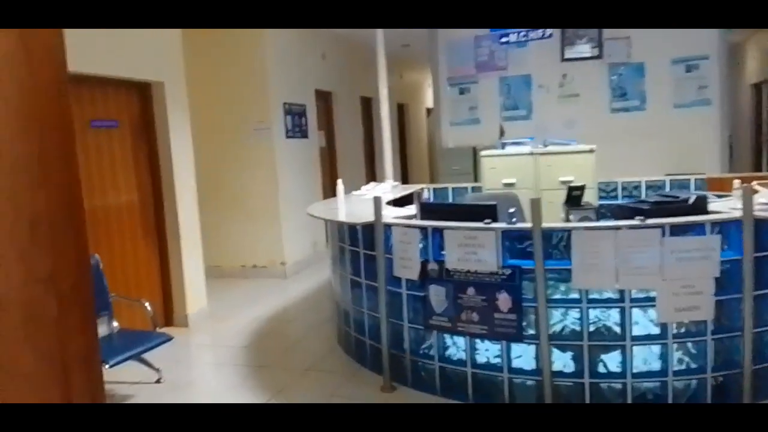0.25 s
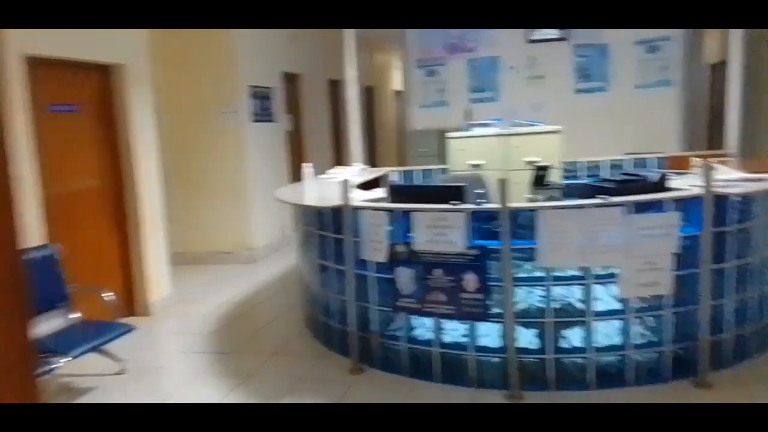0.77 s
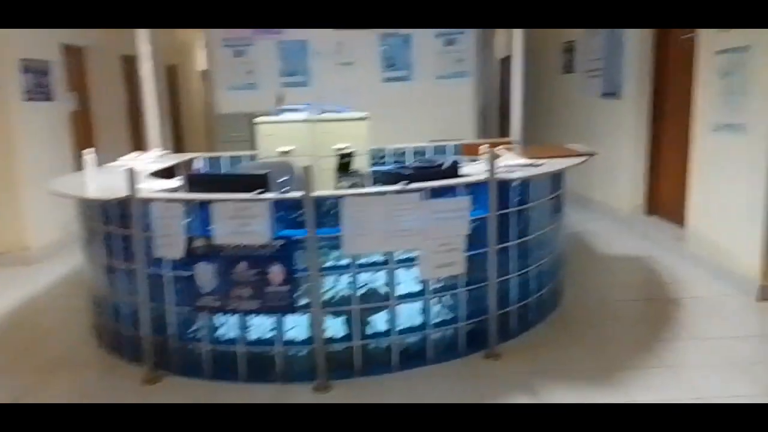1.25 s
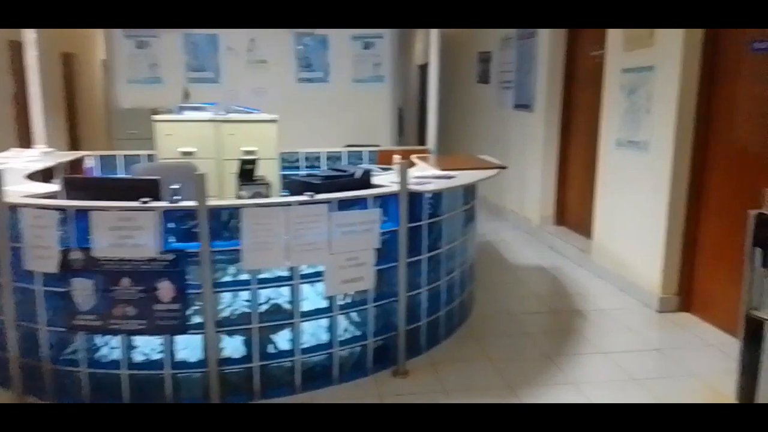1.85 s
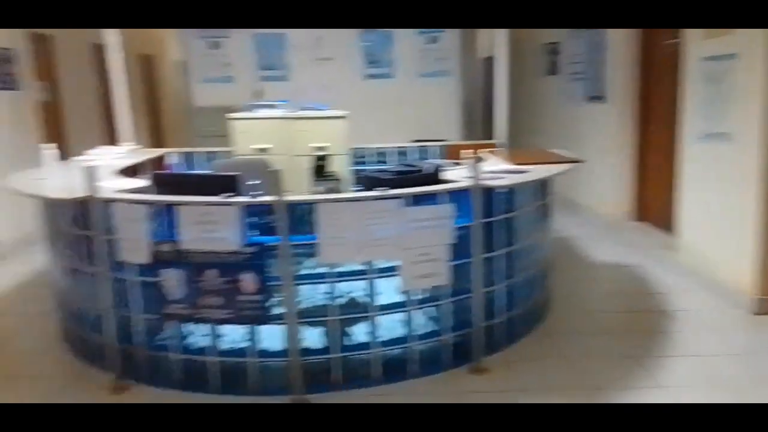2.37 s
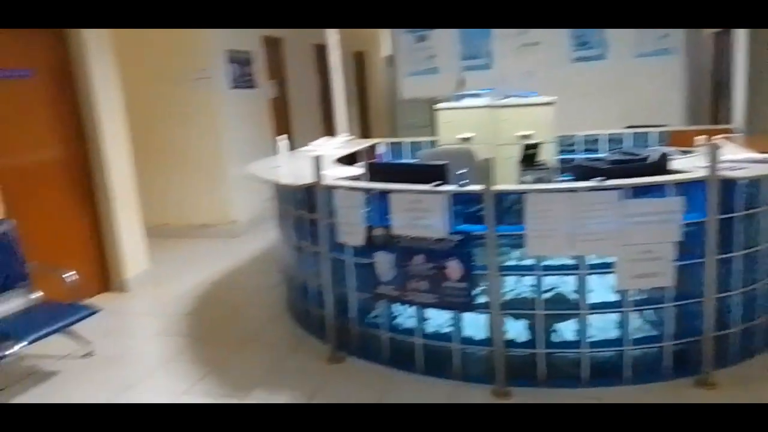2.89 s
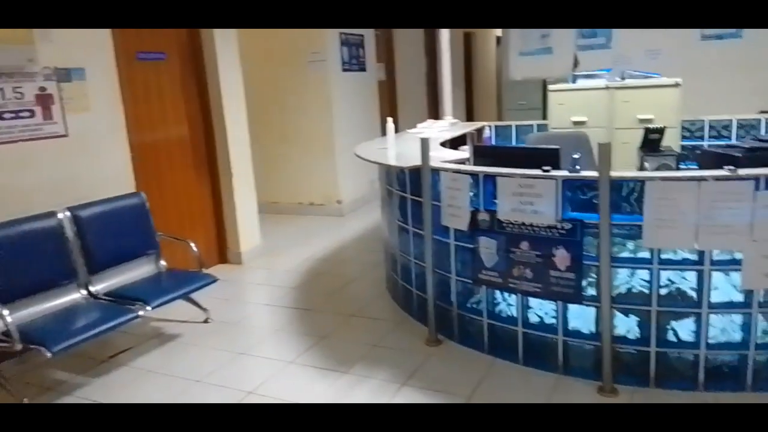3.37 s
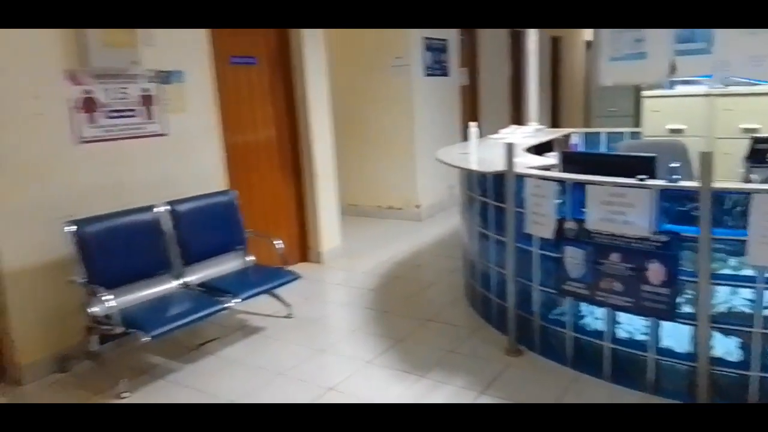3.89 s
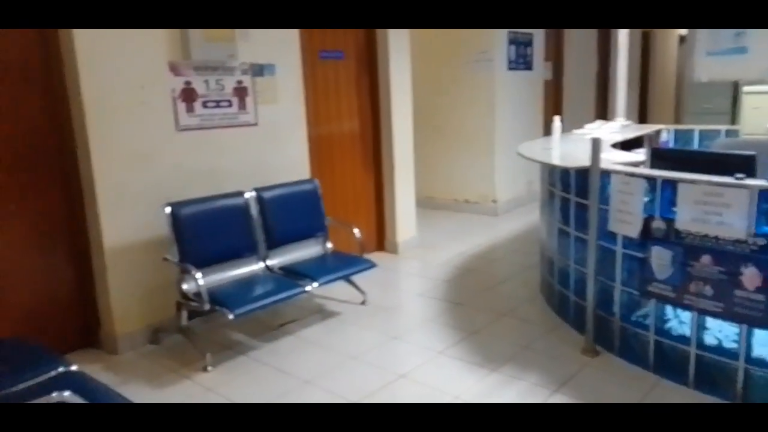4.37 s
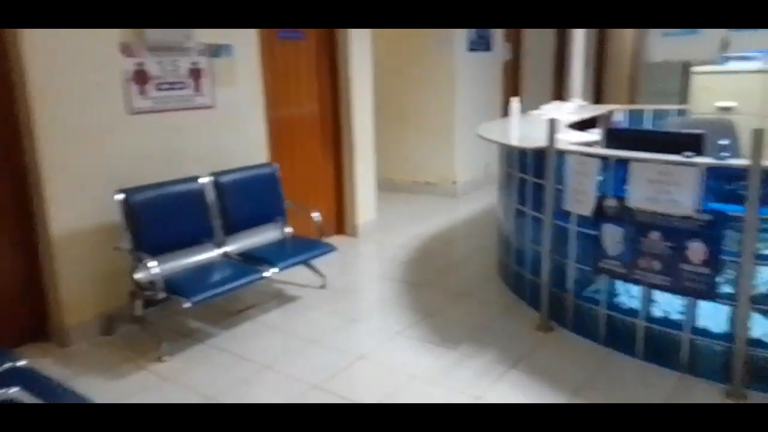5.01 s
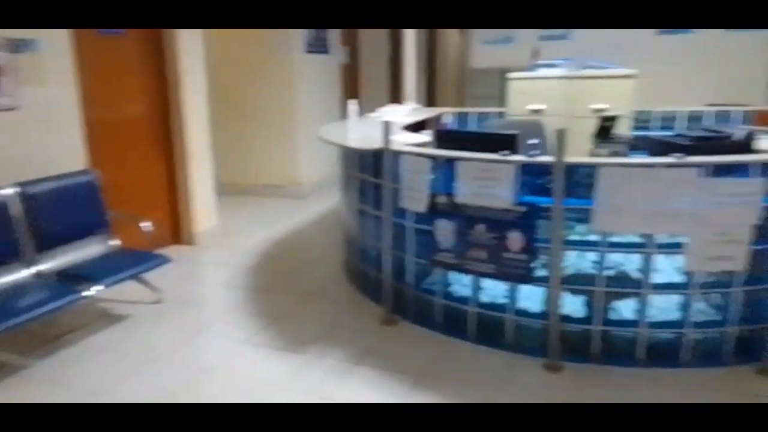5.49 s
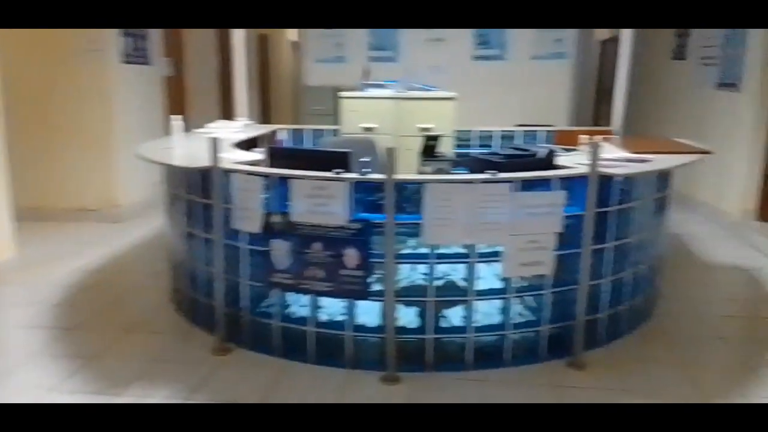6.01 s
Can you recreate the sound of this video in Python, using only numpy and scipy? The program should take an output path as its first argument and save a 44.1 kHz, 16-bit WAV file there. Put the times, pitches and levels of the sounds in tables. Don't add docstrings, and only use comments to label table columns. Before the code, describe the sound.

In a tiled, echoing hall, shrill crickets trill without stopping, their pitch sinking slightly in each short phrase. Rough little bird whistles come in scattered clusters. Early on, soles drag and slap and a faint distant motorbike speeds up then vanishes; late, another crisp slap. Low thuds of a hand on the recorder, patchy hiss and soft traffic rumble sit underneath.

```python
import sys
import numpy as np
from scipy import signal
from scipy.fft import rfft, irfft
from scipy.io import wavfile
from scipy.ndimage import uniform_filter1d, map_coordinates

SR = 44100
rng = np.random.default_rng(int(sys.argv[2]) if len(sys.argv) > 2 else 0)


def undo_db(level):
    steps = np.asarray(level, float) / 20
    return 10 ** steps


def to_wav(s):
    ch = np.atleast_2d(s).T
    pcm = np.round(np.clip(ch, -1, 1) * 32767)
    wavfile.write(sys.argv[1], SR, pcm.astype(np.int16))


N = 275625

# (frequency [Hz], level per Hz [dB])
WING_SPECTRUM = [(2500, -40), (4250, -40), (4560, -29), (5160, -3.5), (5470, 3), (5760, 5), (6200, 1.5),
                 (6430, -8), (6810, -15.5), (7380, -32.5), (7600, -33), (9880, -41), (16700, -120)]
# (lull time [s], lull level [dB], rise [s], crest level [dB])
SWELLS = [(-.3, -48, 0.24, -44), (0.089, -47, .15, -43.5), (.5, -48.5, .13, -44), (.92, -50.5, 0.14, -44),
          (1.38, -50.5, 0.17, -46), (1.89, -51, 0.2, -45), (2.31, -50, 0.23, -46.5),
          (2.83, -50, 0.29, -43.5), (3.2, -47, .12, -47), (3.64, -51, 0.053, -47), (4.0, -49.5, 0.44, -46),
          (4.45, -49, 0.13, -46), (4.94, -48.5, 0.099, -46.5), (5.45, -48.5, 0.21, -46.5),
          (5.93, -50, .11, -46.5), (6.4, -48, .1, -46)]
# (time [s], starting pitch [Hz], nearest singer against the rest [dB])
PHRASES = [(-.3, 5960, -6), (.1, 5980, -8.5), (0.518, 5853, -0.5), (1.05, 5957, 4), (1.47, 5872, 2),
           (1.952, 5937, 3), (2.35, 5793, 0.5), (2.76, 5940, 0.5), (3.27, 5940, 4), (3.698, 5980, -12),
           (4.07, 5900, 4), (4.52, 5975, 3.5), (4.971, 6002, 4.5), (5.399, 5984, 6), (5.848, 5913, 1),
           (6.3, 5800, 0)]
# (time [s], held pitch [Hz], held level [dB], falling level [dB])
CHIRPS = [(0.979, 2930, -57.5, -44), (2.213, 2654, -59.5, -54), (2.47, 3064, -45, -51),
          (2.708, 2794, -48.5, -46.5), (3.043, 3050, -48.5, -45), (3.093, 2790, -45.5, -48),
          (4.026, 2806, -50, -53), (4.073, 2725, -56, -51), (4.401, 2834, -49.5, -55),
          (4.846, 2900, -63.5, -60), (5.069, 2830, -50, -60), (5.408, 2750, -59, -63),
          (5.5, 3050, -58, -49.5), (5.538, 2753, -48.5, -49)]
# (time [s], length [s], pitch [Hz], slide [Hz], level [dB])
WHISTLES = [(0, 0.038, 3156, -376, -42.5), (1.494, 0.26, 2660, -0.5, -69.5), (2.782, 0.08, 2900, -77, -51),
            (3.206, 0.026, 2430, -180, -54.5), (3.466, 0.19, 2730, -62, -64),
            (3.64, 0.348, 2597, -70, -64.5), (3.86, 0.065, 1410, 300, -73.5),
            (3.939, 0.089, 1021, 531, -65), (4.21, 0.046, 2300, 74, -54.5), (4.29, 0.048, 2450, -30, -62),
            (4.483, 0.0406, 3150, -260, -53), (4.988, 0.045, 2360, -180, -63),
            (5.64, 0.032, 3500, -400, -68), (6.185, 0.079, 2330, -67, -69)]
# (frequency [Hz], level per Hz [dB])
GRIT_SPECTRUM = [(6500, -3), (7200, -6), (7500, -4.5), (8700, 2), (9700, -3.5), (11700, -0.5), (12800, -7),
                 (14800, -3.5), (15480, 7), (15800, -30)]
# (time [s], length [s], level [dB], top octave against it [dB])
DRAGS = [(.85, 0.45, -76.5, -9), (1.3, .09, -57.5, -18), (1.42, .03, -54, -15), (1.57, 0.034, -62, -17),
         (1.65, 0.0082, -62, -17), (1.95, 0.0092, -52.5, -12), (1.98, 0.09, -59, -13),
         (5.3, 0.097, -75.5, -10), (5.44, 0.053, -66, -26), (5.54, .02, -62, -21), (5.62, 0.057, -70, -22)]
# (time [s], peak level [dB], lower part level [dB])
SLAPS = [
    (1.294, -62, -55),
    (1.418, -47, -70),
    (1.6551, -53, -74),
    (1.9444, -41, -68),
    (2.0028, -46, -70),
    (2.1256, -51.5, -97),
    (2.1849, -66, -91),
    (2.9966, -58, -88),
    (5.497, -51, -75),
    (5.5225, -37, -73),
]
# (time [s], level [dB], top octave against it [dB])
HISS = [(0, -77.5, -1), (.3, -77, 4), (.9, -83, 4.5), (1.85, -82, 3), (2.3, -83, 8.5), (2.95, -78, 6.5),
        (3.1, -68, 0), (3.5, -72, -1.5), (3.75, -79.5, 4.5), (4.25, -74, 5), (5.0, -77.5, 10),
        (5.4, -81, 8.5), (6.0, -78.5, 9.5), (6.25, -81.5, 6)]
# (time [s], peak level [dB])
BUMPS = [
    (1.22, -38),
    (3.768, -40.5),
    (4.112, -45),
    (4.272, -46),
    (5.13, -44),
    (5.873, -36),
    (5.972, -41),
]
# (time [s], firing rate [Hz], level [dB])
BIKE = [
    (0.7, 64, -70.5),
    (1.06, 68.64, -62.5),
    (1.38, 71.0, -65),
    (1.566, 73.1, -57.5),
    (1.802, 77.6, -66),
    (1.992, 76.84, -62),
    (2.4, 74.5, -87),
]
# (order of the firing rate, level [dB])
EXHAUST_ORDERS = [(2, -5.5), (3, 2), (4, -29), (5, 0), (6, -5.5), (7, -3), (8, -10), (10, -32), (11, -13)]
# (time [s], hold [s], upper middle level [dB], middle against it [dB])
STIRS = [(0, 0.022, -59, -25), (1.03, 0.22, -59.5, -16), (1.3, 0.19, -63.5, -5), (1.95, .04, -65.5, -16),
         (2.25, 0.061, -68, -15), (2.5, 0.12, -68, -3.5), (2.75, 0.055, -60, -12), (3.08, 0.13, -59, -11),
         (3.97, .12, -82.5, 18), (4.2, 0.049, -65, -9), (4.47, 0.071, -60.5, -23),
         (4.95, 0.027, -61.5, -31), (5.13, 0.095, -65.5, -12), (5.61, 0.093, -58, -19),
         (6.15, 0.095, -65.5, -21)]
# (time [s], level [dB], its brighter part against it [dB])
TOWN = [(0.0, -57, -20), (0.28, -58.5, -12), (0.52, -56.5, -25.5), (1.02, -58.5, -16.5), (1.04, -58, -7.5),
        (1.76, -58.5, -8), (2.14, -58.5, -13.5), (2.73, -56.5, -10.5), (3.46, -58.5, -13.5),
        (3.85, -58, -31), (4.02, -58, -13), (4.42, -61, -14.5), (4.92, -61, -16.5), (5.5, -63, -17),
        (5.87, -63, -6.5), (6.25, -63.5, -20)]
# (frequency [Hz], level per Hz [dB])
RUMBLE_SPECTRUM = [(12, -56), (20, -24), (27, -29), (86, -31), (100, -14), (128, 1), (216, -3), (251, 0.5),
                   (313, -7.5), (369, -5.5), (512, -9.5), (700, -24), (910, -41), (1540, -120)]

SYLLABLE_HZ, SWEEP_HZ = 43.98, 1182
SAG_DB, SINK_S = 1.5, 0.1
TIRED_HZ, TIRED_AT, HIDDEN_DB = 5565, .52, 8
LOW_CHOIR_DB = -66.06
HELD_S, SCOOP_HZ = 0.084, 552
FALL_AFTER_S, FALL_S, FALL_FROM, FALL_TO = .054, .055, 1.23, 1.04
TOUCH_DB_PER_S, LIFT_DB_PER_S = 1500, 132
OPEN_DB_PER_S, SHUT_DB_PER_S = 400, 38
SHUT_DB = (-81, -88)
DEEP_DB, DEEP_SWING_DB, DEEP_GAIN_DB_PER_S = -6, 2, 1.33
GATE_DB = -100
HALL_T60_S = 0.59
CUTOFF_HZ = 16400


def choirs():
    near_db, centre_hz = phrasing()
    spread = rng.uniform(-1, 1, (7, 2))
    far = sum(undo_db(1.5 * drift(4.62))
              * cricket(SYLLABLE_HZ * (1 + 0.083 * a), centre_hz * (1 + .04 * b), SWEEP_HZ, duty=.75)
              for a, b in spread)
    near = cricket(SYLLABLE_HZ, centre_hz - 100, 0.7 * SWEEP_HZ, duty=.55)
    high = rms_one(far) + undo_db(np.minimum(near_db, 4.0)) * near
    mass = colour(rng.standard_normal(N), WING_SPECTRUM)
    high = colour(high + undo_db(-5.0) * hall(high), WING_SPECTRUM) + undo_db(-4) * mass

    lean_db = (centre_hz - 5770) / 120
    upper = band(high, 5770, 9000, order=1)
    lower = band(high, 3700, 5770, order=1)
    high = undo_db(lean_db) * upper + undo_db(-lean_db) * lower
    high /= np.sqrt(uniform_filter1d(high ** 2, size=6000))

    low = sum(undo_db(5.1 * drift(7.2)) * cricket(52 * (1 + .2 * a), 3850 + 60 * b, 460, duty=.8)
              for a, b in spread)
    low = rms_one(band(low + undo_db(-7.5) * hall(low), 2900, 4060, order=4))
    return undo_db(swell()) * high + undo_db(LOW_CHOIR_DB) * low


def cricket(rate_hz, centre_hz, sweep_hz, duty):
    stroke = (np.cumsum(rate_hz * (1 + .04 * drift(9))) / SR + rng.random()) % 1
    along = np.clip(stroke / duty, 0, 1)
    pitch = centre_hz * (1 + .012 * drift(30)) + sweep_hz * (.5 - along)
    tone = np.sin(2 * np.pi * np.cumsum(pitch) / SR)
    return rms_one(np.sin(np.pi * along) ** 0.17 * tone)


def swell():
    knots = []
    for (s, lull_db, rise, crest_db), after in zip(SWELLS, SWELLS[1:]):
        crest_end = max(after[0] - SINK_S, s + rise + 0.0084)
        knots += [(s, lull_db), (s + rise, crest_db), (crest_end, crest_db - SAG_DB)]
    return in_time(knots)[0]


def phrasing():
    knots = []
    for (s, hz, near_db), after in zip(PHRASES, PHRASES[1:]):
        tired_s = s + TIRED_AT * (after[0] - s)
        knots += [(s, near_db - HIDDEN_DB, hz), (tired_s, near_db, TIRED_HZ)]
    return in_time(knots + [(PHRASES[-1][0], -HIDDEN_DB, PHRASES[-1][1])])


def birds():
    dry = np.zeros(N)
    flutter, warble = undo_db(4.5 * drift(90)), 1 + .021 * drift(200)
    for s, length, start_hz, end_hz, scoop_hz, level_db in notes():
        at = np.arange(round(s * SR), min(N, round((s + length) * SR)))
        age = (at - at[0]) / SR
        pitch = start_hz + (end_hz - start_hz) * age / length - scoop_hz * np.exp(-age / 0.00792)
        turn = 2 * np.pi * np.cumsum(pitch * warble[at]) / SR
        voice = np.sin(turn) + undo_db(-21) * np.sin(turn / 2)
        breath = np.sin(np.pi * (age / length) ** 0.82) ** 0.49
        dry[at] += undo_db(level_db) * breath * voice
    rasp = rms_one(band(rng.standard_normal(N), 60, 390))
    dry *= flutter * (1 + 0.29 * rasp)
    return undo_db(-4.5) * dry + undo_db(-5.5) * hall(dry)


def notes():
    held = [(s, HELD_S, hz, .99 * hz, SCOOP_HZ, db) for s, hz, db, _ in CHIRPS]
    falling = [(s + FALL_AFTER_S, FALL_S, FALL_FROM * hz, FALL_TO * hz, 0, db) for s, hz, _, db in CHIRPS]
    single = [(s, length, hz, hz + slide, 0, db) for s, length, hz, slide, db in WHISTLES]
    return held + falling + single


def sandals():
    hiss_db, top_db = in_time(HISS)
    drag_db, bright_db = (openings(DRAGS, k, TOUCH_DB_PER_S, LIFT_DB_PER_S) for k in (2, 3))
    grit = rng.standard_normal(N) * undo_db(0.45 * rng.exponential(1, N))
    grit = colour(streaky(grit, depth_db=6.0, hold=110), GRIT_SPECTRUM)
    lower = rms_one(band(grit, 4880, 9880, order=4))
    upper = rms_one(band(grit, 7800, 15000, order=4))
    hiss = (undo_db(hiss_db) + undo_db(drag_db)) * lower
    hiss += (undo_db(hiss_db + top_db) + undo_db(bright_db)) * upper

    slaps = undo_db(-4.5) * burst(strikes(SLAPS, column=1), 0.04, 4500, 10500)
    slaps += undo_db(9.0) * burst(strikes(SLAPS, column=2), 0.078, 1820, 3670)
    slaps += undo_db(-9.5) * burst(strikes(SLAPS, column=1), 0.0055, 6700, 15000)
    return undo_db(-1.5) * hiss + slaps + undo_db(-2.5) * hall(slaps)


def hand():
    push = band(strikes(BUMPS, column=1) + 1e-18, 95, 410, order=1)
    return undo_db(31.5) * band(push, 150, 420, order=2)


def motorbike():
    firing_hz = in_time(BIKE)[0] * (1 + .013 * drift(25))
    turn = 2 * np.pi * np.cumsum(firing_hz) / SR
    level_db = in_time(BIKE, left=-120, right=-120)[1]
    level = uniform_filter1d(undo_db(level_db), size=4000)
    return level * sum(undo_db(db + 4.5 * drift(11)) * np.sin(order * turn + order ** 2)
                       for order, db in EXHAUST_ORDERS)


def air():
    breeze = streaky(rng.standard_normal(N), depth_db=4.0, hold=60)
    town_db, bright_db = in_time(TOWN)
    upper_db, middle_db = (np.maximum(openings(STIRS, k + 2, OPEN_DB_PER_S, SHUT_DB_PER_S), SHUT_DB[k])
                           for k in range(2))
    bands = [(town_db + bright_db, 620, 1037), (middle_db - 2.0, 1150, 1720), (upper_db - 2.0, 1900, 4800)]
    return sum(undo_db(level_db + 0.95 * drift(12)) * rms_one(band(breeze, low_hz, high_hz, order=4))
               for level_db, low_hz, high_hz in bands)


def town():
    level_db = in_time(TOWN)[0] + 1.46
    deep_db = DEEP_DB + DEEP_SWING_DB * drift(8.6) + DEEP_GAIN_DB_PER_S * np.arange(N) / SR
    rumble = colour(rng.standard_normal(N), RUMBLE_SPECTRUM)
    deep = band(rumble, 26, 125, order=2)
    return undo_db(level_db + 0.87 * drift(9)) * (band(rumble, 166.5, 970) + undo_db(deep_db) * deep)


def hall(x):
    age = np.arange(SR) / SR
    tail = rng.standard_normal(len(age)) * undo_db(-60 * age / HALL_T60_S) * (age > .006)
    return signal.fftconvolve(x, tail / np.sqrt(np.sum(tail ** 2)))[:N]


def streaky(x, depth_db, hold):
    cells = signal.stft(x, nperseg=512)[2]
    chance = uniform_filter1d(rng.standard_normal(cells.shape), size=hold, axis=1)
    return rms_one(signal.istft(cells * undo_db(depth_db * rms_one(chance)), nperseg=512)[1][:N])


def openings(rows, column, rise, fall):
    now = np.arange(N) / SR
    levels = []
    for row in rows:
        early = np.maximum(row[0] - now, 0)
        late = np.maximum(now - row[0] - row[1], 0)
        levels.append(sum(row[2:column + 1]) - rise * early - fall * late)
    return np.max(levels, axis=0)


def strikes(rows, column):
    clicks = np.zeros(N)
    clicks[[round(row[0] * SR) for row in rows]] = [undo_db(row[column]) for row in rows]
    return clicks


def burst(clicks, t60, low_hz, high_hz):
    fade = signal.lfilter([1], [1, -undo_db(-60 / (t60 * SR))], clicks + 1e-18)
    return fade * rms_one(band(rng.standard_normal(N), low_hz, high_hz))


def drift(rate):
    knots, coarse = rng.standard_normal(1500), np.arange(0, N + 16, 16)
    curve = map_coordinates(knots, [coarse / SR * rate], order=3, mode="wrap")
    return np.interp(np.arange(N), coarse, curve)


def colour(x, points):
    hz, level_db = np.transpose(points)
    grid = np.arange(N // 2 + 1) * SR / N + 1
    bins = rfft(x)
    own = np.sqrt(uniform_filter1d(np.abs(bins) ** 2, size=900)) + 1e-9
    wanted_db = np.interp(np.log(grid), np.log(hz), level_db, left=-90, right=-90)
    return rms_one(irfft(bins / own * undo_db(wanted_db), N))


def band(x, low_hz, high_hz, order=2):
    return signal.sosfilt(signal.butter(order, [low_hz, high_hz], "band", fs=SR, output="sos"), x)


def in_time(rows, **ends):
    s, *columns = np.transpose(rows)
    return [np.interp(np.arange(N) / SR, s, c, **ends) for c in columns]


def rms_one(x):
    return x / np.sqrt(np.mean(x ** 2) + 1e-20)


def gate(x):
    cells = signal.stft(x, nperseg=512)[2]
    power = uniform_filter1d(uniform_filter1d(np.abs(cells) ** 2, size=9, axis=2), size=3, axis=1)
    gain = 0.33 + 0.77 * power / (power + undo_db(2 * GATE_DB))
    return signal.istft(cells * gain, nperseg=512)[1][:, :N]


def scene():
    one = choirs() + birds() + sandals() + hand() + motorbike() + air() + town()
    return np.stack([one, one])


def roll_off(x):
    return signal.sosfilt(signal.butter(12, 15640, fs=SR, output="sos"), x)


def record(dry):
    dipped = dry - .9 * band(dry, 4280, 4620, order=1)
    top_cut = signal.cheby2(12, 70, CUTOFF_HZ, fs=SR, output="sos")
    mix = signal.sosfilt(top_cut, gate(dipped))
    return roll_off(mix)


dry = scene()
out = record(dry)
to_wav(out)
```